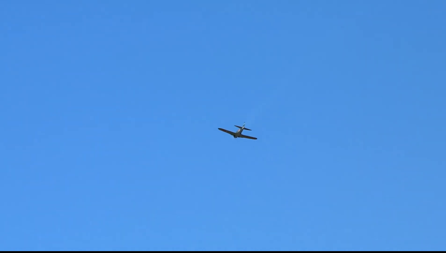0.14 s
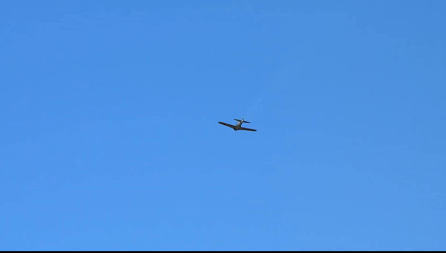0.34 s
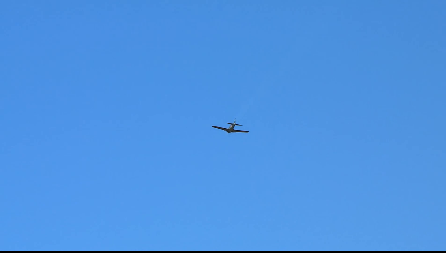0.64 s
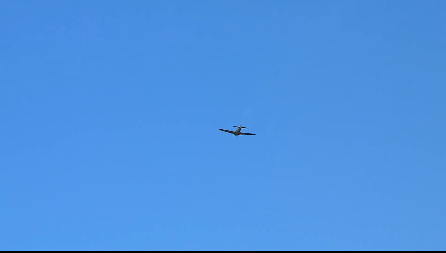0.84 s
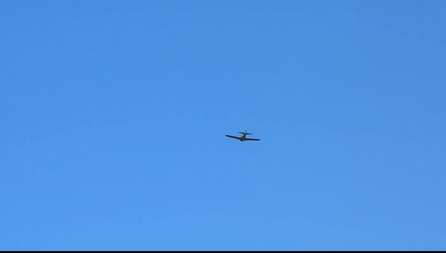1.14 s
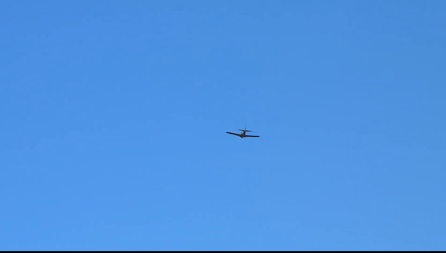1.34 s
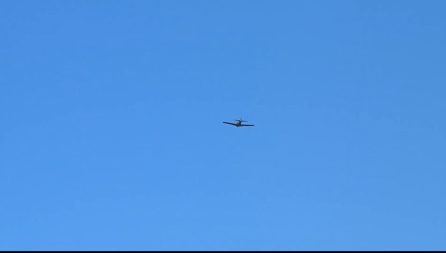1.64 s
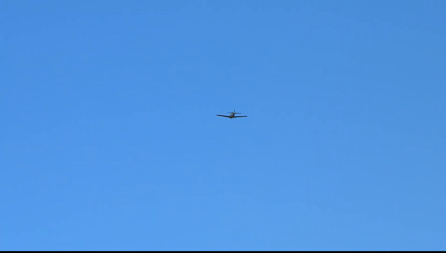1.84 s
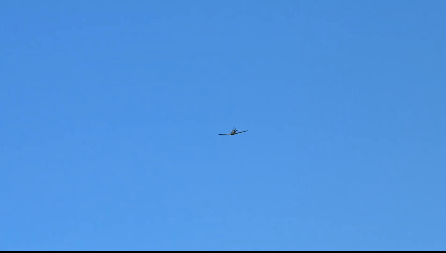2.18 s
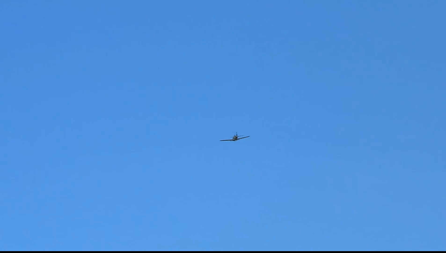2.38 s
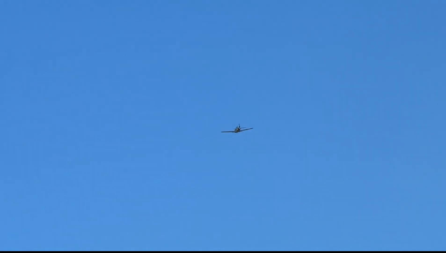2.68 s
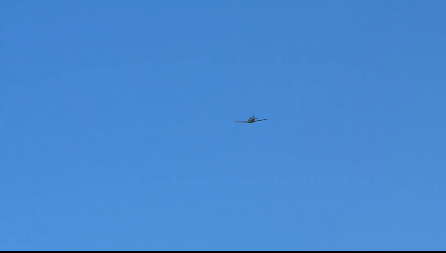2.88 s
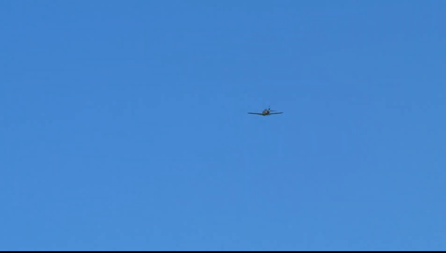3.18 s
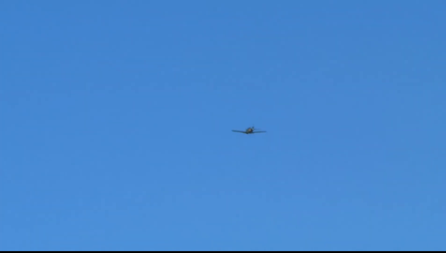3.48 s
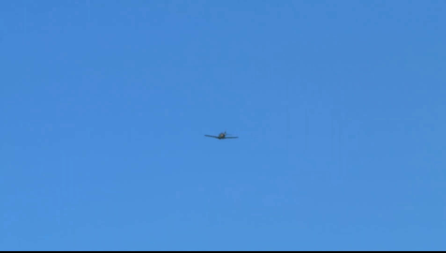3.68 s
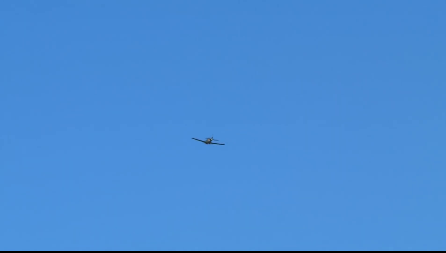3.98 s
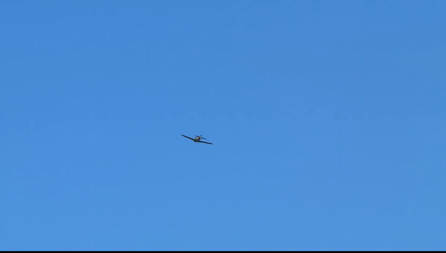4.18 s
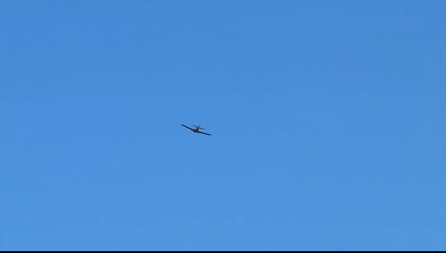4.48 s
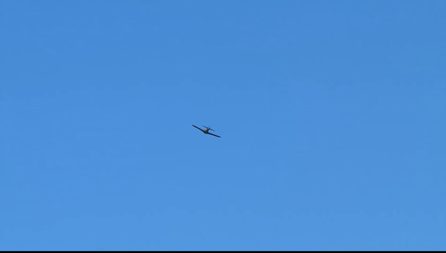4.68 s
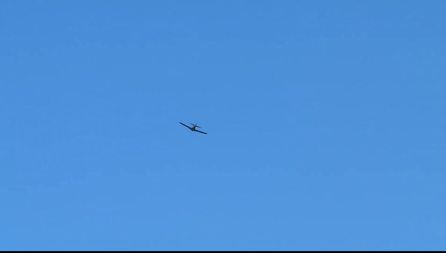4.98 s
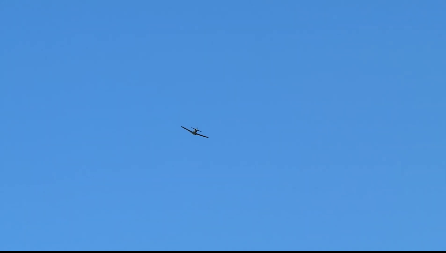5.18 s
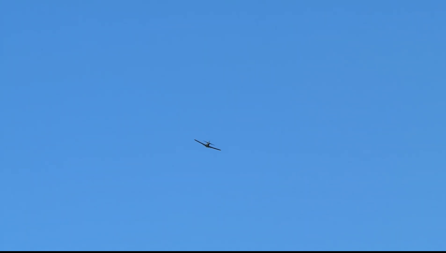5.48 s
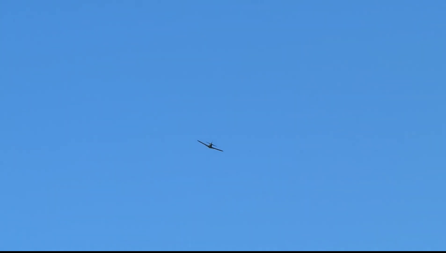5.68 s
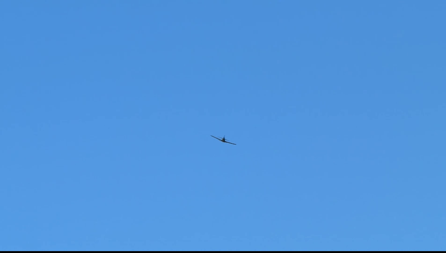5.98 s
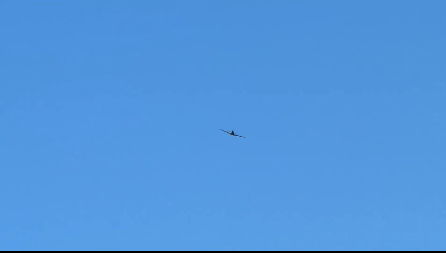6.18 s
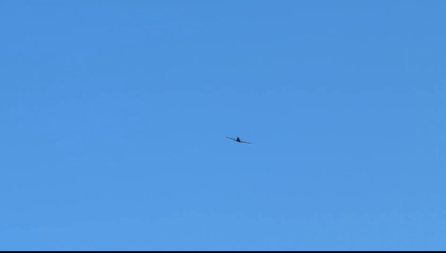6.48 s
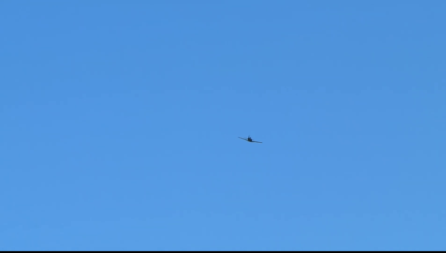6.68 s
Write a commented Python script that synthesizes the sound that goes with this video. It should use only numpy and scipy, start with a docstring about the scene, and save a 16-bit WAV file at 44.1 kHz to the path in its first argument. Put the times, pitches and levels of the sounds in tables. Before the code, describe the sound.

Gusty wind buffets the microphone outdoors as a model propeller plane drones above, wavering in pitch with spells of exhaust crackle.

```python
"""An open field, a model airplane flying away high overhead, its speed hunting about once a second.
Propeller buzz, exhaust beat and turbulent roar fade in the moving air; the exhaust cracks through
in spells. The sound reaches two microphone ports, and gusts buffet them, mostly the right one.
A farther engine hums faintly behind it all."""
import sys
import numpy as np
from scipy import signal
from scipy.fft import rfft, irfft, next_fast_len
from scipy.io import wavfile
from scipy.ndimage import uniform_filter1d

SR = 44100
rng = np.random.default_rng(int(sys.argv[2]) if len(sys.argv) > 2 else 0)


def int16_out(signal):
    """Quantize to a 16-bit WAV file."""
    q = np.round(np.clip(np.atleast_2d(signal).T, -1, 1) * 32767)
    wavfile.write(sys.argv[1], SR, q.astype(np.int16))


N = 301203


def gain_of(db):
    return 10 ** (np.asarray(db) / 20)


def unit_rms(x):
    return x / np.sqrt(np.mean(abs(x) ** 2) + 1e-20)


def eq_at(points, hz):
    """Columns of a table over log frequency."""
    f, *values = np.transpose(points)
    return [np.interp(np.log(hz + 1), np.log(f + 1), v) for v in values]


def follow(rows):
    """Columns of a table over time, one value a sample."""
    s, *values = np.transpose(rows)
    return [np.interp(np.arange(N) / SR, s, v) for v in values]


def colour(x, gains):
    """Filters x by a function of frequency."""
    size = next_fast_len(N + 8192)
    return irfft(rfft(x, size) * gains(np.fft.rfftfreq(size, 1 / SR)), size)[..., :N]


def impulse(eq):
    """The tightest impulse response with this EQ (minimum phase)."""
    log_gain = np.log(gain_of(eq_at(eq, abs(np.fft.fftfreq(4096, 1 / SR)))[0]))
    return np.fft.ifft(np.exp(np.conj(signal.hilbert(log_gain)))).real[:2048]


def swell(middle, width, db):
    """A bell-shaped rise and fall in power."""
    return gain_of(2 * db) * np.exp(-(2 * (np.arange(N) / SR - middle) / width) ** 2)


def drift(max_hz):
    """A smooth random wobble of rms 1."""
    t = np.arange(N // 256 + 2) * 256 / SR
    f = max_hz * np.geomspace(.15, 1, 20)
    slow = np.sin(2 * np.pi * (f[:, None] * t + rng.random((20, 1)))).T @ f ** -.2
    return np.interp(np.arange(N) / SR, t, unit_rms(slow))


def tones(turns, partials, fade_db, blur):
    """Partials of a rotation; eddies on the path fade each on its own and smear the high ones most."""
    out = np.zeros(N)
    for k, db in partials:
        phase = 2 * np.pi * (k * turns + rng.random() / 2) + blur * np.sqrt(k) * drift(22)
        out += np.sqrt(2) * gain_of(db + fade_db * drift(7)) * np.cos(phase)
    return out


def noise(eq, patchy_db):
    """Two rows of shaped noise, mottled by drifting patches in the spectrum."""
    patches = rng.standard_normal((N // 128 + 5, 257)).T
    patches = unit_rms(uniform_filter1d(uniform_filter1d(patches, 5, axis=0), 25, axis=1))
    _, _, spectra = signal.stft(rng.standard_normal((2, N)), nperseg=512, noverlap=384)
    spectra *= gain_of(patchy_db * patches[:, :spectra.shape[2]])
    mottled = signal.istft(spectra, nperseg=512, noverlap=384)[1][:, :N]
    return unit_rms(colour(mottled, lambda f: gain_of(eq_at(eq, f)[0])))


# the far engine's run: t/s, firing rate/Hz, level/dB
FAR_RUN = [(0, 53.8, -48), (.5, 57.8, -50), (1, 63.93, -46.5), (1.4, 66.3, -42.5), (2, 67.9, -52),
           (2.6, 68, -69), (6.83, 67.9, -59.5)]
# its hum: multiple of the firing rate, level/dB
FAR_PARTIALS = [(4, 3), (5, 0), (6, -2.5), (7, 0), (10, -3)]


def far_engine():
    """A faint hum that speeds up, settles and fades."""
    hz, db = follow(FAR_RUN)
    return gain_of(db) * tones(np.cumsum(hz) / SR, FAR_PARTIALS, fade_db=2.5, blur=.23)


# gusts on the exposed right port: t/s, hold/s, level/dB
GUSTS = [(0.182, 0.17, -11), (0.403, 0.03, -13), (0.486, 0.29, -16.5), (0.975, 0.085, -14.5),
         (1.119, 0.12, -15), (1.27, 0.2, -13), (1.508, 0.38, -18), (1.798, 0.26, -15), (2.093, 0.35, -15),
         (2.47, 0.044, -23), (2.77, 0.12, -24.5), (3.098, 0.083, -20), (3.212, .13, -25.5),
         (3.344, 0.09, -17.5), (3.492, 0.046, -22.5), (3.566, 0.067, -21), (3.615, 0.1, -15),
         (3.755, 0.1, -20), (3.9, 0.1, -29), (4.054, 0.1, -22.5), (4.142, 0.096, -16), (4.21, 0.073, -11.5),
         (4.28, .05, -19), (4.319, 0.1, -11), (4.437, 0.19, -20.5), (4.652, 0.31, -15), (5.02, 0.19, -14),
         (5.207, 0.1, -11.5), (5.344, 0.19, -13.5), (5.577, 0.31, -15.5), (5.951, 0.18, -16.5),
         (6.207, 0.16, -15.5), (6.328, 0.13, -14), (6.528, 0.37, -15)]


def gust(start, hold, db, rise_s=.015, fall_db_per_s=219.5):
    """Power of one gust: quick attack, hold, steep release."""
    t = np.arange(N) / SR - start
    return (np.clip(t / rise_s, 0, 1) * gain_of(db - fall_db_per_s * np.maximum(t - hold, 0))) ** 2


# wind on the sheltered left port: t/s, level/dB
LEE_LEVEL = [(0, -36), (1, -37), (2.2, -29.5), (2.45, -31.5), (2.9, -35), (3.6, -44), (4.0, -26),
             (4.5, -36), (4.75, -23), (5.1, -37.5), (5.7, -42), (6.1, -32.5), (6.45, -37), (6.72, -28),
             (6.83, -18.5)]
# dull left rumble, brighter right rumble, low-mid flutter: f/Hz, level/dB
LEFT_WIND_EQ = [(15, -10), (35, 19), (60, 2.5), (120, 8.5), (200, -14.5), (400, -20), (900, -78.5)]
RIGHT_WIND_EQ = [(8.8, -29.5), (15, -5.5), (69, 4), (128, 1.5), (213, -8), (395, -29.5), (520, -43),
                 (628, -28.5), (900, -41.5), (1170, -52), (1980, -120)]
FLUTTER_EQ = [(120, -29.5), (200, 6.5), (320, -1), (500, -12.5), (900, -60.5)]
# rides on the rumble's low shelf and on the flutter: t/s, gain/dB
SHELF_RIDE = [(0, -2.5), (.8, 0.5), (1.6, 0.5), (1.85, -5), (2.1, 2.5), (2.5, 1.5), (3.5, 5.5), (4.3, 0.5),
              (4.8, 2.5), (5.2, -7.5), (5.8, -6.5), (6.3, -1.5), (6.83, -0.5)]
FLUTTER_RIDE = [(0, -2), (2.2, -4), (3.2, -28), (4.2, -7), (5.3, 2.5), (6.83, 0.5)]


def wind(lull_db=-33.5, shelf_hz=95):
    """Lumpy low turbulence, unrelated at the two ports; hard gusts bring up the flutter."""
    exposed = gain_of(2 * lull_db) + sum(gust(*row) for row in GUSTS)
    level = np.array([gain_of(follow(LEE_LEVEL)[0]), np.sqrt(exposed)])
    lumps = unit_rms(gain_of(2 * np.array([drift(45), drift(45)])))
    rumble = lumps * [noise(LEFT_WIND_EQ, patchy_db=3.5)[0], noise(RIGHT_WIND_EQ, patchy_db=.67)[0]]
    deep = colour(rumble, lambda f: 1 / (1 + (f / shelf_hz) ** 4))
    rumble += (gain_of(follow(SHELF_RIDE)[0]) - 1) * deep
    flutter = gain_of(follow(FLUTTER_RIDE)[0]) * lumps * noise(FLUTTER_EQ, patchy_db=.5)
    return level * (rumble + level * flutter)


# wind thumps: t/s, peak before panning/dB, f/Hz, left minus right/dB, attack/s
SLAPS = [(1.34, -19, 188, -23, 0.0033), (1.376, -16.5, 168, -21, 0.0022), (1.86, -30, 324, 12, 0.012),
         (1.905, -18, 106.6, -23.5, 0.0075), (2.138, -15.5, 95, -21, 0.0074),
         (3.441, -23.5, 150, -30, 0.0025), (3.717, -25, 109, -29, 0.0047), (4.228, -20.5, 128, -27, 0.0086),
         (4.373, -19, 77, -26, 0.0085), (4.387, -18, 175, -36, 0.0013), (5.25, -14.5, 121, -25, 0.0023),
         (5.276, -17.5, 111, -28, 0.0047), (5.375, -26, 186, -35, 0.0039)]


def air_slaps():
    """Air slaps a port: a short low thump, panned hard."""
    out = np.zeros((2, N))
    t = np.arange(6000) / SR
    for s, peak_db, hz, side_db, attack in SLAPS:
        thump = gain_of(peak_db) * np.sin(2 * np.pi * hz * t) * t / attack * np.exp(1 - t / attack)
        start = round(s * SR)
        out[:, start:start + len(t)] += thump * gain_of([[side_db / 2], [-side_db / 2]])
    return out


# rides on the airplane's noise bands: t/s, roar/dB, hiss/dB, fizz/dB
AIR_RIDES = [(0, -40.5, -33.5, -40), (.42, -42.5, -37.5, -45.5), (.8, -39, -37, -43.5),
             (1.22, -36, -34, -43.5), (1.43, -38.5, -37, -48), (1.62, -37.5, -35, -49.5),
             (2.0, -37, -37.5, -49.5), (2.38, -34, -34.5, -44.5), (2.7, -38.5, -38.5, -49),
             (2.88, -38, -32.5, -44.5), (3.08, -37, -38.5, -47.5), (3.45, -34, -34.5, -48.5),
             (4.0, -37.5, -37, -44.5), (4.45, -49, -41, -53.5), (4.72, -41.5, -38.5, -46.5),
             (5.2, -44, -41, -45.5), (5.38, -49.5, -49.5, -53.5), (5.66, -45, -39, -48),
             (5.74, -34.5, -38.5, -46.5), (5.96, -37.5, -40, -51), (6.03, -41.5, -41.5, -45.5),
             (6.5, -44, -38.5, -53), (6.83, -38, -35.5, -51)]
# flares of sizzle: centre t/s, width/s, level/dB
FLARES = [(.66, .3, -42), (2.2, .4, -47), (2.87, .15, -35), (4.05, .17, -36), (4.9, .2, -46),
          (6.24, .15, -37)]


def sizzle_power(over_fizz_db=1.5):
    """Envelope of the sizzle near 4.8 kHz: it rides the fizz and flares up now and then."""
    fizz_db = follow(AIR_RIDES)[2]
    return gain_of(2 * (fizz_db + over_fizz_db)) + sum(swell(*row) for row in FLARES)


# the airplane's noise bands, dark to bright: f/Hz, level/dB
ROAR_EQ = [(60, -21.5), (250, 3.5), (500, 9.5), (650, -1.5), (800, 8), (1100, 5.5), (1600, 3.5),
           (2200, 1.5), (3500, -67)]
HISS_EQ = [(1000, -29.5), (1800, -10), (2500, 0.5), (3100, 0), (3500, -3.5), (4200, -14), (6000, -91.5)]
FIZZ_EQ = [(2800, -44.5), (3500, -10), (4000, -3), (4500, -15.5), (5500, -8), (6300, -15), (7000, -27.5),
           (7500, -21.5), (8200, -28), (9400, -87)]
SIZZLE_EQ = [(4000, -42), (4500, 10.5), (4800, 8), (5100, 7.5), (5600, -58.5)]


def turbulent_air(turns, firings):
    """Each firing and each blade pushes a puff of turbulent air; two rows of noise."""
    roar_db, hiss_db, fizz_db = follow(AIR_RIDES)
    puffs = .4 + np.exp(-(firings % 1) / .22)
    puffs = unit_rms(uniform_filter1d(uniform_filter1d(puffs, 40), 40))
    chop = unit_rms(1 + .083 * np.cos(2 * np.pi * BLADE_PASSES * turns))
    roar = gain_of(roar_db + 4) * puffs * noise(ROAR_EQ, patchy_db=1.5)
    hiss = gain_of(hiss_db + 2.5) * chop * noise(HISS_EQ, patchy_db=1.6)
    fizz = gain_of(fizz_db + 4.5) * chop * noise(FIZZ_EQ, patchy_db=5)
    sizzle = np.sqrt(sizzle_power()) * noise(SIZZLE_EQ, patchy_db=1.5)
    return roar + hiss + fizz + sizzle


# the whirr: multiple of its own rate, level against the hiss ride/dB
WHIRR_PARTIALS = [(2, -12), (4, -16), (12, -22.5), (21, -12), (24, -13.5)]


def whirr(turns, speed_ratio=2.215):
    """A thin whirr that tracks the speed but sits off the blades' harmonics."""
    partials = [(speed_ratio * k, db) for k, db in WHIRR_PARTIALS]
    hiss_db = follow(AIR_RIDES)[1]
    return gain_of(hiss_db) * tones(turns, partials, fade_db=4.5, blur=.12)


# spells of crackle: centre t/s, width/s, level/dB, brightness/0-1
CRACK_SPELLS = [(1.1, .16, -37, .6), (1.67, .22, -31, .5), (2.37, .14, -32, .7), (3.1, .25, -41, .4),
                (3.68, .3, -40, .5), (5.745, .03, -37, .5), (5.78, .07, -31, .55), (5.845, .06, -34, .15),
                (5.94, .1, -33, .5), (6.037, .025, -37, .05), (6.8, .12, -31, .7)]
# placed firings: t/s, level against a typical firing/dB
ACCENTS = [(1.063, 3), (1.617, 2), (1.649, 4), (1.713, 4), (2.288, 5), (2.429, 3), (3.002, 3), (3.812, 4),
           (5.757, 0), (5.773, 5), (5.79, 4), (5.836, 6), (5.853, 0), (5.885, -3), (5.899, 4), (5.934, 0),
           (5.951, 2), (5.968, 4), (6.037, 5), (6.71, -3), (6.74, 3), (6.755, -2), (6.77, 4), (6.785, 4),
           (6.801, 3), (6.817, 3)]
# a firing's bright crack and dull knock: f/Hz, level/dB
CRACK_EQ = [(300, -27), (800, 1.5), (1300, 10), (2000, 9.5), (2800, 13.5), (4000, -15), (6000, -42.5),
            (8000, -90.5)]
KNOCK_EQ = [(120, -30.5), (350, 7.5), (600, 0.5), (780, 15), (1000, 6.5), (1400, 3), (2200, -1),
            (4000, -77)]
# variants of the knock: pitch ratio
KNOCK_PITCHES = [.9, 1, 1.15, 1.5]


def exhaust_cracks(firings, calm_db=-7, calm_brightness=.5, spread_db=1.8):
    """Each firing cracks and knocks with a ragged tail, uneven in size and in the knock's pitch."""
    calm = gain_of(2 * (follow(AIR_RIDES)[0] + calm_db))  # between spells, tucked under the roar
    bright = calm_brightness * calm + sum(share * swell(*row) for *row, share in CRACK_SPELLS)
    dull = (1 - calm_brightness) * calm + sum((1 - share) * swell(*row) for *row, share in CRACK_SPELLS)
    strength_db = spread_db * rng.standard_normal(600)
    variant = rng.integers(0, len(KNOCK_PITCHES), 600)
    for s, db in ACCENTS:
        accent = round(firings[round(s * SR)])
        strength_db[accent], variant[accent] = db, 1  # accents keep the plain pitch
    count = np.maximum.accumulate(firings).astype(int)
    clicks = -np.diff(np.floor(firings), prepend=0)
    tails = .17 * np.exp(-(firings % 1) / .13) * rng.standard_normal(N)
    bursts = gain_of(strength_db)[count] * (clicks + tails)
    cracks = signal.oaconvolve(bursts, impulse(CRACK_EQ))[:N]
    knocks = np.zeros(N)
    for k, pitch in enumerate(KNOCK_PITCHES):
        ring = unit_rms(impulse([(f * pitch, db) for f, db in KNOCK_EQ]))
        knocks += signal.oaconvolve(bursts * (variant[count] == k), ring)[:N]
    return np.sqrt(bright) * unit_rms(cracks) + np.sqrt(dull) * unit_rms(knocks)


# rides on the airplane's tones: t/s, whine/dB, low blade tone/dB, buzz/dB, exhaust beat/dB
TONE_RIDES = [(0, -35, -37.5, -45.5, -42), (.38, -41, -40, -50, -49), (.9, -33, -36.5, -53, -44.5),
              (1.3, -40, -43, -48.5, -63), (1.6, -34.5, -40.5, -49.5, -40.5), (1.95, -35, -42.5, -47, -36),
              (2.4, -34, -44, -52, -40), (2.72, -38, -37.5, -57, -35), (2.95, -32, -35.5, -48.5, -39),
              (3.2, -38, -45, -43.5, -51), (3.6, -32.5, -38.5, -52.5, -34), (4.02, -36, -37, -42, -35.5),
              (4.45, -49, -50, -56.5, -48), (4.75, -40.5, -43, -44.5, -32.5),
              (5.05, -37.5, -38.5, -51.5, -40), (5.42, -43, -55, -60, -35), (5.7, -38, -65, -46.5, -44.5),
              (6.05, -44, -39.5, -48.5, -31), (6.45, -43.5, -63, -54, -39),
              (6.83, -40.5, -63, -66.5, -43.5)]
# ride on the second beat tone: t/s, level/dB
SECOND_BEAT_RIDE = [(0, -40.5), (.4, -41.5), (.6, -60), (.85, -38), (1.1, -49), (1.3, -37.5), (1.55, -45),
                    (1.9, -40), (2.4, -42.5), (2.75, -41), (3.15, -45), (3.55, -38.5), (3.85, -46.5),
                    (4.1, -37.5), (4.4, -57), (4.7, -31), (4.95, -49), (5.15, -36), (5.35, -57),
                    (5.55, -41), (5.75, -53), (5.95, -36), (6.4, -48.5), (6.65, -37.5), (6.83, -39)]
# beat and low throb: multiple of the blade rate, plus multiple of the firing rate, level/dB
BEAT_PARTIALS = [(1, 0, -11), (1, 1, -1), (1, 3, -11), (2, 1, -17), (0, 8, -25.5), (0, 12, -14),
                 (0, 16, -18.5)]
THROB_PARTIALS = [(0, 1, -37.5), (0, 2, -50.5), (0, 3, -49)]


def exhaust_beat(turns):
    """The exhaust fires a little slower than the speed and beats with the blades, over a low throb."""
    def sum_tones(rows, fade_db, blur):
        partials = [(BLADE_PASSES * n + FIRINGS_PER_TURN * m, db) for n, m, db in rows]
        return tones(turns, partials, fade_db, blur)
    beat = gain_of(follow(TONE_RIDES)[3]) * sum_tones(BEAT_PARTIALS, fade_db=2.2, blur=.12)
    second = gain_of(follow(SECOND_BEAT_RIDE)[0]) * sum_tones([(1, 2, 0)], fade_db=1, blur=.12)
    return beat + second + sum_tones(THROB_PARTIALS, fade_db=5.5, blur=.034)


# overtone swells: centre t/s, width/s, lowest and highest multiple of the speed, level of each/dB
OVERTONE_SWELLS = [(.12, 0.35, 56, 56, -39), (.15, 0.49, 60, 60, -42.5), (.1, 0.36, 64, 64, -47),
                   (.05, 0.17, 72, 72, -60.5), (.1, 0.49, 40, 40, -42), (0.7, 0.39, 28, 28, -42),
                   (0.56, .25, 53.2, 53.2, -49), (0.93, 0.66, 40, 40, -40.5), (.85, 0.21, 56, 60, -47.5),
                   (1.1, .2, 46.5, 46.5, -41), (.8, .2, 53.2, 53.2, -47.5), (0.62, .2, 64, 68, -45),
                   (1.3, 0.16, 46.5, 46.5, -49.5), (1.23, .14, 44, 52, -42), (1.42, 0.36, 52, 60, -41.5),
                   (1.8, 0.25, 40, 40, -44.5), (2.91, 0.22, 68, 80, -44), (2.92, 0.32, 53.2, 53.2, -40),
                   (2.99, 0.21, 56, 64, -40), (2.5, 0.25, 28, 28, -45.5), (2.55, 0.41, 20, 28, -50),
                   (3, 0.32, 20, 24, -37.5), (3.1, .16, 52, 60, -34.5), (3.5, 0.13, 40, 48, -38.5),
                   (3.1, 0.45, 28, 28, -47.5), (3.2, 0.17, 48, 48, -43), (4.6, 0.13, 48, 48, -46),
                   (4.22, 0.12, 64, 64, -40), (3.55, .2, 48, 48, -39.5), (5.1, 0.18, 48, 48, -44),
                   (4.0, 0.3, 28, 36, -41.5), (4.01, 0.42, 76, 80, -44.5), (4.15, 0.54, 48, 48, -38.5),
                   (4.22, 0.26, 46.5, 46.5, -38.5), (4.25, 0.2, 64, 68, -49), (3.1, 0.13, 60, 60, -35),
                   (4.58, 0.46, 48, 48, -42), (4.55, 1, 24, 24, -48), (6.2, 0.23, 48, 48, -39.5),
                   (6.2, 0.21, 28, 32, -44.5), (6.68, .35, 48, 48, -37.5), (6.65, .3, 46.5, 46.5, -46.5)]


def singing_overtones(turns, grain_hz=30, grain_db=1.8, blur=.11):
    """Overtones of the blades and the whirr sing out for a moment; eddies break them into grains."""
    out = np.zeros(N)
    for middle, width, low, high, db in OVERTONE_SWELLS:
        near = slice(max(round((middle - 1.5 * width) * SR), 0), round((middle + 1.5 * width) * SR))
        envelope = np.sqrt(2 * swell(middle, width, db))
        for k in np.arange(low, high + 1, BLADE_PASSES):
            phase = 2 * np.pi * (k * turns + rng.random()) + blur * np.sqrt(k) * drift(grain_hz)
            grains = unit_rms(gain_of(grain_db * drift(grain_hz)))
            out[near] += (envelope * grains)[near] * np.cos(phase[near])
    return out


# the buzz, and four groups of its bright edge: multiple of the speed, level/dB
BUZZ_PARTIALS = [(4, -5), (10, -6.5), (12, -0.5), (14, -15), (18, -8), (20, -1), (22, -14.5), (24, -3),
                 (26, -1.5), (28, 2), (30, -7.5), (32, 0), (34, -5)]
EDGE_GROUPS = [
    [(36, -2), (38, -17), (40, 2.5), (42, -7.5), (44, -3)],
    [(46, -16.5), (48, -1), (50, -3.5), (52, -10), (54, -8)],
    [(56, -5), (58, -18.5), (60, -7), (62, -7), (64, -8), (66, -5.5), (68, -8.5)],
    [(72, -7), (74, -16), (76, -13), (80, 0), (84, -6.5), (90, -4), (96, -2)],
]
# trims of the first three groups, against the hiss, hiss and fizz rides: gain/dB
EDGE_TRIMS = [-9.5, -8.5, 0]


def propeller(turns):
    """Blade passes sound every fourth multiple of the speed; unequal blades add the even ones between."""
    whine_db, low_db, buzz_db, _ = follow(TONE_RIDES)
    _, hiss_db, fizz_db = follow(AIR_RIDES)
    out = gain_of(whine_db) * tones(turns, [(16, .16)], fade_db=.04, blur=.13)
    out += gain_of(low_db) * tones(turns, [(8, .14)], fade_db=2, blur=.061)
    out += gain_of(buzz_db) * tones(turns, BUZZ_PARTIALS, fade_db=4, blur=.14)
    edge_db = [db + trim for db, trim in zip((hiss_db, hiss_db, fizz_db), EDGE_TRIMS)]
    edge_db.append(10 * np.log10(sizzle_power()) - 9)  # the top group sits under the sizzle
    for db, group in zip(edge_db, EDGE_GROUPS):
        out += gain_of(db) * tones(turns, group, fade_db=2.2, blur=.125)
    return out


# the hunting speed, before inertia rounds it: t/s, f/Hz (a quarter of the blade rate)
SPEED = [(0, 64.1), (.27, 64.85), (.66, 60.4), (1.18, 68.31), (1.81, 62.82), (2.21, 65.89), (2.37, 65.1),
         (2.68, 59.93), (2.89, 59.84), (3.16, 67.56), (3.31, 66.46), (3.76, 61.23), (4.08, 62.05),
         (4.37, 68.47), (4.52, 68.45), (4.9, 61.49), (5.21, 60.05), (5.67, 67.18), (6.03, 59.99),
         (6.24, 60.95), (6.54, 66.46), (6.71, 67.1), (6.83, 65.8)]
# the firing slips ahead: t/s, lead/cycles
FIRING_SLIP = [(0, .27), (1.2, .27), (1.5, .54), (2.2, .5), (3.7, .56), (5.75, .72), (5.9, .8), (6.05, .72),
               (6.7, 1.12), (6.83, 1.2)]
BLADE_PASSES, FIRINGS_PER_TURN = 4, .973  # both per cycle of the speed


def airplane(inertia_s=.1):
    """One hunting speed drives every layer; returns the tones and cracks, then the turbulent air."""
    speed_hz = follow(SPEED)[0]
    for _ in range(2):
        speed_hz = uniform_filter1d(speed_hz, round(inertia_s * SR), mode="nearest")
    turns = np.cumsum(speed_hz) / SR
    firings = FIRINGS_PER_TURN * turns + follow(FIRING_SLIP)[0]
    tonal = propeller(turns) + singing_overtones(turns) + exhaust_beat(turns) + whirr(turns)
    air = turbulent_air(turns, firings)
    return tonal + exhaust_cracks(firings), air


# the right port, behind the housing: f/Hz, right minus left/dB, lag/rad, noise coherence/0-1
RIGHT_PORT = [(97, 4, 0.12, 1), (465, -2.5, .45, 0.99), (1110, 0, 0.82, 0.77), (1420, -0.5, 1.32, 1),
              (2140, -4, 2.33, 0.97), (2020, -19, 2.1, 0.21), (2860, -7, 2.2, 0.95), (2960, -23, 3.9, 0.82),
              (3370, -7, 0.35, 0.27), (3220, -22, 1.6, 0.2), (4360, -4.5, 1, 0.24), (4600, -10, 2.05, 0.6),
              (7100, 0, 4.5, 0.1), (7800, -4, 3.5, 0.26)]


def ports(direct, air):
    """The housing delays and shades the right port; the air's second row scatters into that side only."""
    def shade(f):
        db, lag, _ = eq_at(RIGHT_PORT, f)
        return gain_of(db) * np.exp(-1j * lag)

    def coherence(f):
        return eq_at(RIGHT_PORT, f)[2].clip(0, 1)
    right = colour(direct, shade) + colour(air[0], lambda f: shade(f) * coherence(f))
    right += colour(air[1], lambda f: shade(f) * np.sqrt(1 - coherence(f) ** 2))
    return np.array([direct + air[0], right])


def scene():
    """Both engines through the ports, with the wind buffeting on top."""
    direct, air = airplane()
    return ports(direct + far_engine(), air) + wind() + air_slaps()


def record(dry, ceiling=.96, high_cut_hz=9400):
    """Soft overload on the hardest gusts, then a steep high cut."""
    soft = dry / (1 + (dry / ceiling) ** 4) ** (1 / 4)
    high_cut = signal.firwin(511, high_cut_hz, window=("kaiser", 9), fs=SR)
    return signal.oaconvolve(soft, high_cut[None], "same")


dry = scene()
out = record(dry)
int16_out(out)
```